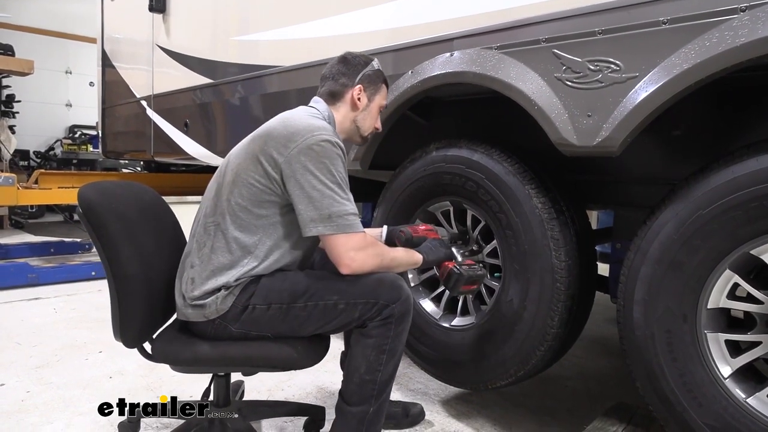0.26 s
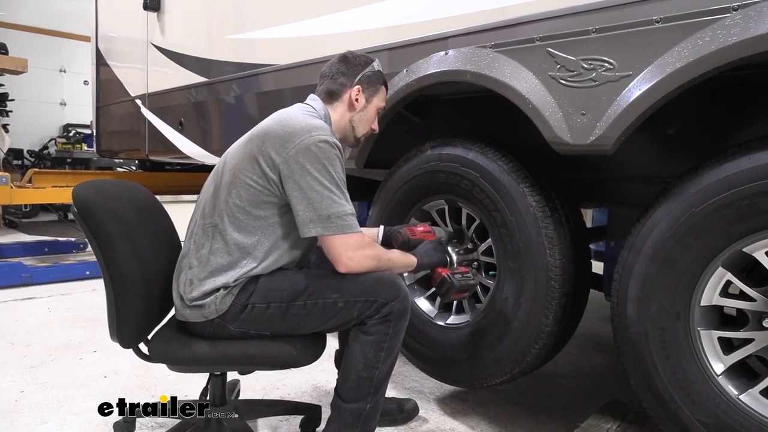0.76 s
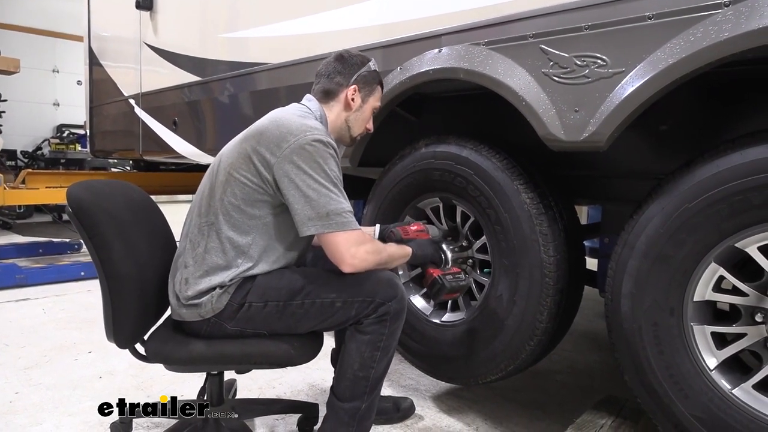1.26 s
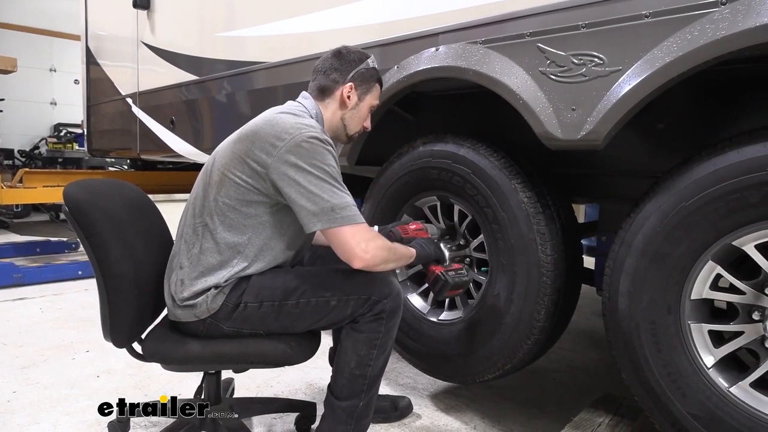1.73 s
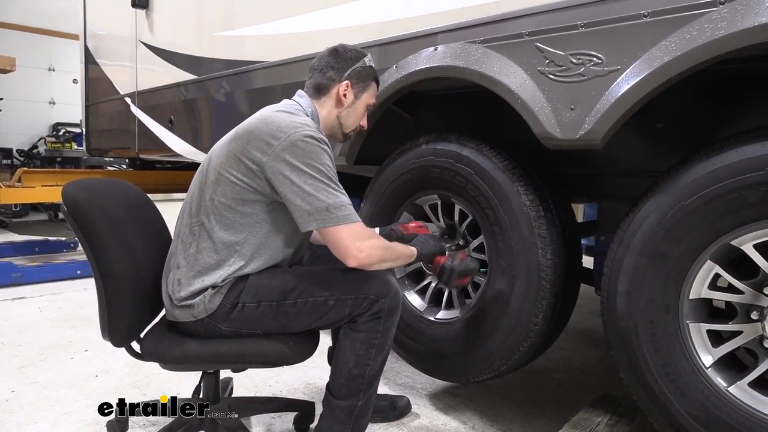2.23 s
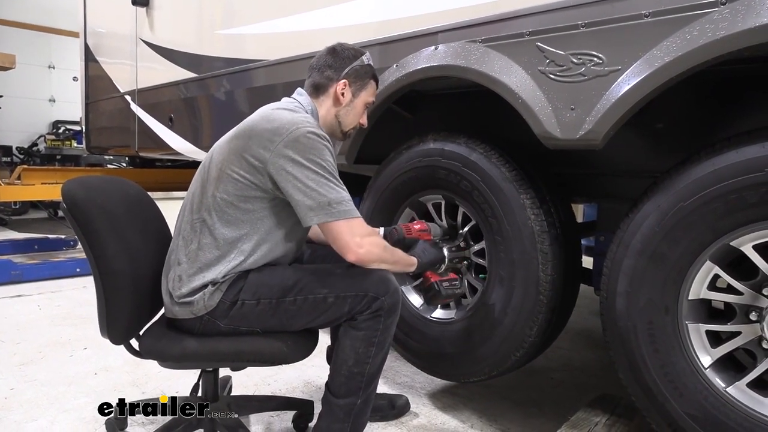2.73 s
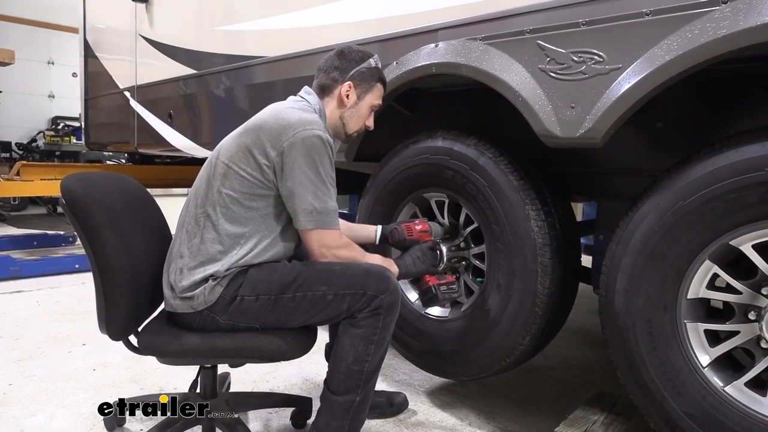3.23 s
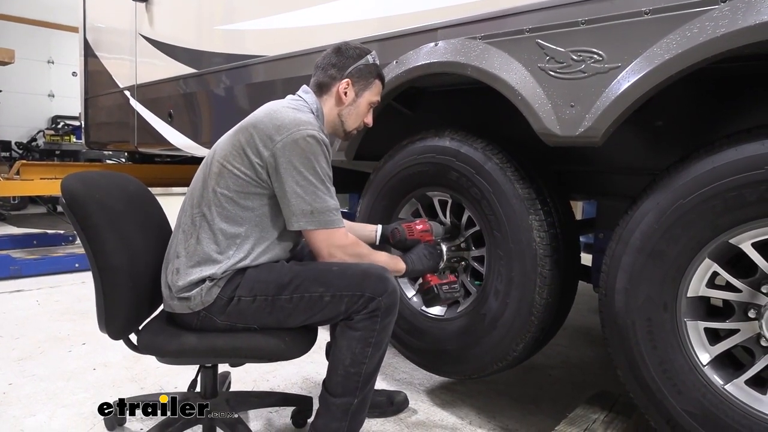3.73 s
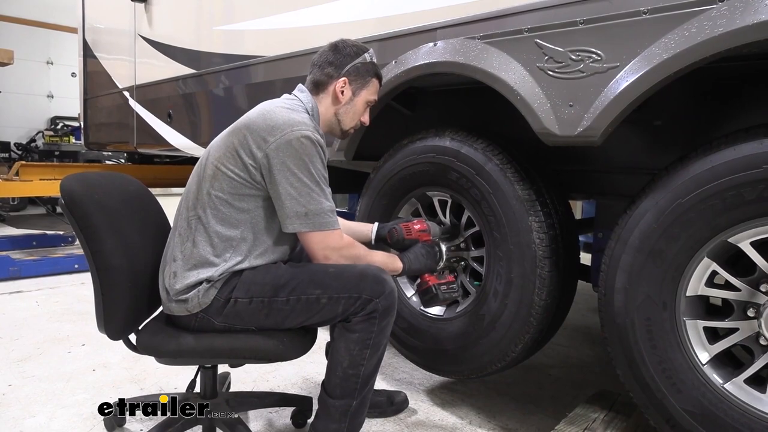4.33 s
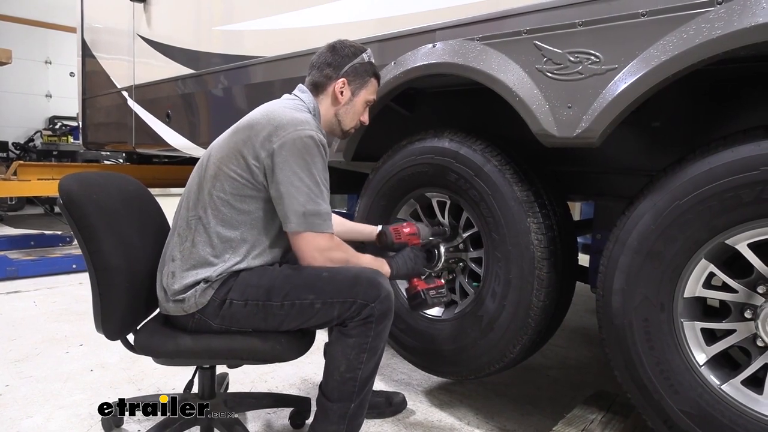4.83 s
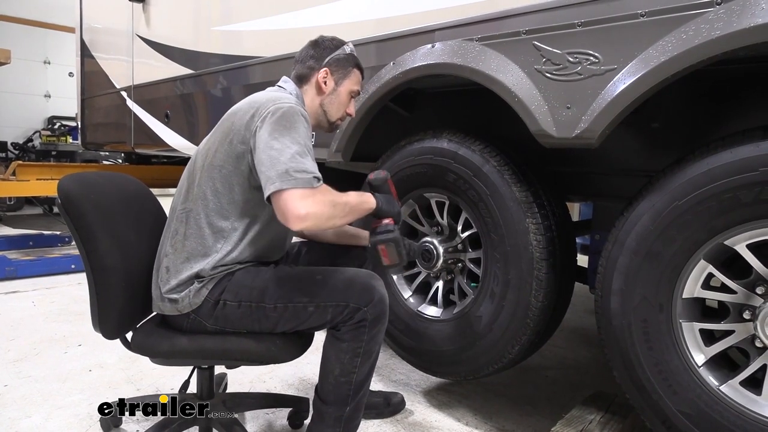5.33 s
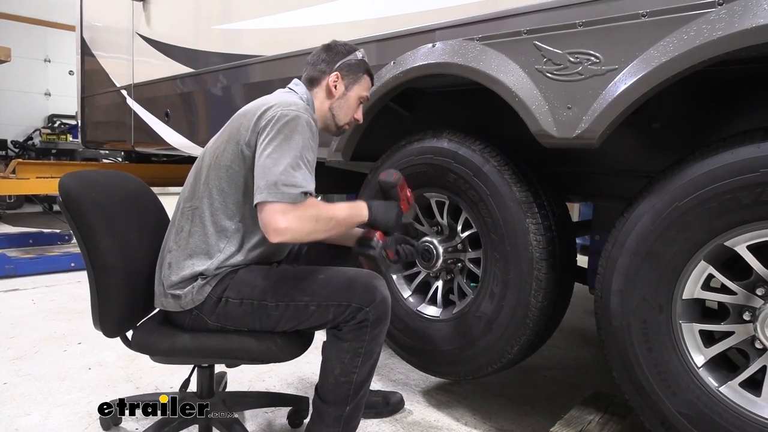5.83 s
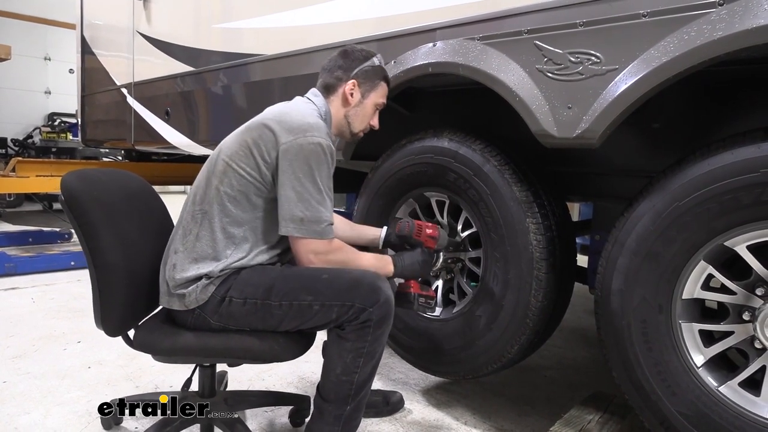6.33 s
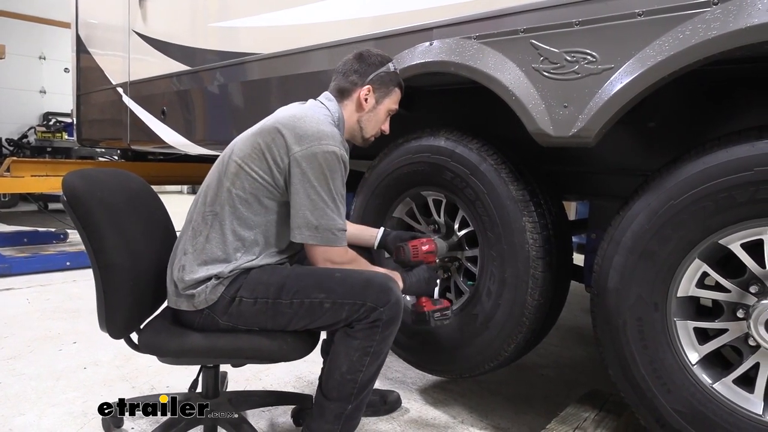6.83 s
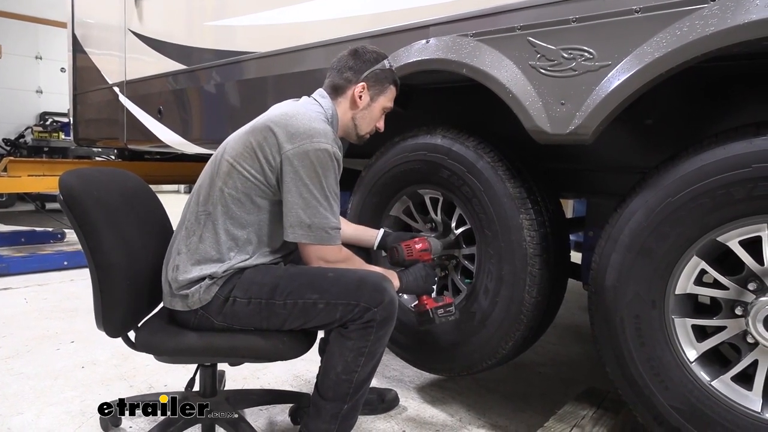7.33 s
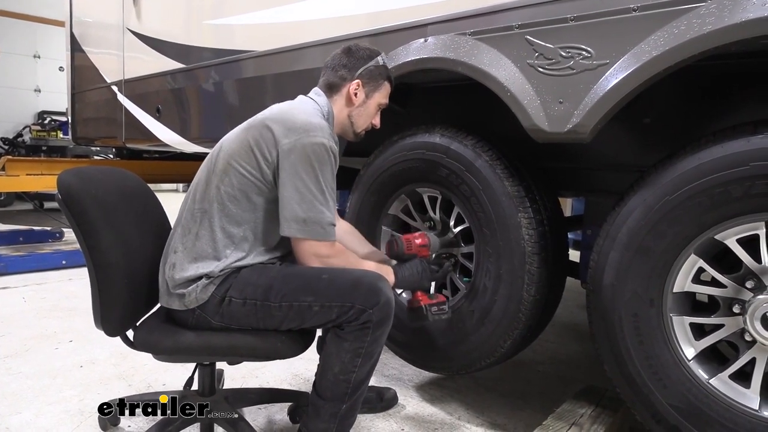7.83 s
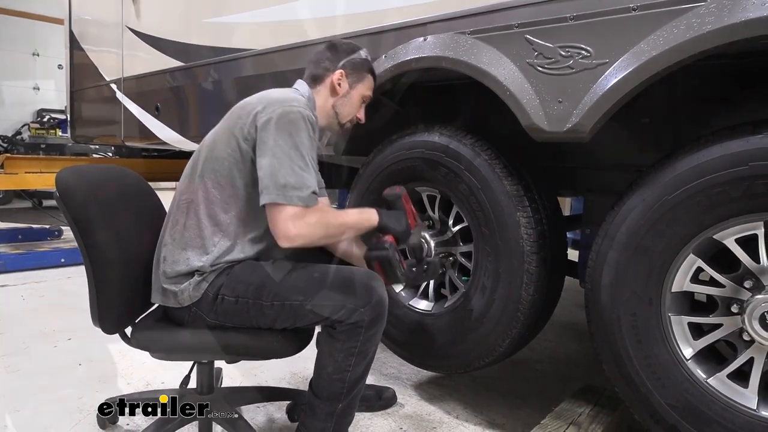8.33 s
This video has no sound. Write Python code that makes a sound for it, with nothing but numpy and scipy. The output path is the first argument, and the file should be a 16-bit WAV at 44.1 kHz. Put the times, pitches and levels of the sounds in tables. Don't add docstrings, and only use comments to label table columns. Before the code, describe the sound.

A cordless impact wrench fires short whining bursts on wheel nuts, motor coasting down and grinding to a stop, with metallic cracks and hollow wheel knocks.

```python
import sys
import numpy as np
from scipy import signal
from scipy.fft import rfft, irfft, next_fast_len
from scipy.io import wavfile
from scipy.ndimage import uniform_filter1d

SR = 44100
rng = np.random.default_rng(int(sys.argv[2]) if len(sys.argv) > 2 else 0)


def ratio_of_db(decibels):
    return 10 ** (np.asarray(decibels, float) / 20)


def persist_wave(psi):
    counts = np.round(np.clip(psi, -1, 1) * 32767).astype(np.int16)
    wavfile.write(sys.argv[1], SR, np.atleast_2d(counts).T)


N = 377937
T = np.arange(N) / SR

# press and release in seconds, pole rate it climbs towards in Hz,
# friction while coasting in Hz per s, time the friction takes to bite in seconds.
PULLS = [
    (1.746, 1.872, 2730, 10750, .09),
    (2.278, 2.352, 2410, 15000, .01),
    (3.695, 3.802, 2940, 3676, .001),
    (4.024, 4.203, 3266, 2384, .001),
    (4.427, 4.529, 3285, 2016, .001),
    (6.932, 7.273, 3377, 2040, .001),
]


def unit(x):
    return x / np.sqrt(np.mean(x ** 2))


def coloured(points, x=None):
    hz, db = np.transpose(points)
    size = next_fast_len(N)
    f = np.maximum(np.arange(size // 2 + 1) * SR / size, 1)
    gain = ratio_of_db(np.interp(np.log(f), np.log(hz), db, left=-90, right=-90))
    source = rng.standard_normal(N) if x is None else x
    return unit(irfft(rfft(source, size) * gain, size)[:N])


def walk(rate):
    k = int(SR / rate)
    held = np.repeat(rng.standard_normal(N // k + 1), k)
    return 1.6 * uniform_filter1d(held, k)[:N]


def ring(x, hz, t60):
    r = np.exp(-np.log(1000) / (t60 * SR))
    w = 2 * np.pi * hz / SR
    return signal.lfilter([0, np.sin(w)], [1, -2 * r * np.cos(w), r * r], x)


def band(x, lo_hz, hi_hz):
    return signal.sosfilt(signal.butter(2, [lo_hz, hi_hz], "bandpass", fs=SR, output="sos"), x)


def add(out, s, x, db):
    i = int(s * SR)
    x = x[:N - i]
    out[i:i + len(x)] += ratio_of_db(db) * x / np.abs(x).max()


def swells(s, db, rise, fall, floor_db):
    power = ratio_of_db(floor_db) ** 2
    for at, top, up, down in np.broadcast(s, db, rise, fall):
        below_top = np.where(T < at, up * (at - T), down * (T - at))
        power = power + ratio_of_db(top - below_top) ** 2
    return 10 * np.log10(power)


def rotor():
    quick_s, slow_s, quick_share = .047, .167, .778
    oil_drag_per_s, air_drag_per_hz_s = .274, 1.3524e-4
    lead_s, settle_s = 0.0058, 0.027
    pressed, released, top, friction, bite = np.transpose(PULLS)
    dt = .001
    steps = np.arange(0, T[-1], dt)
    hz, now, start = np.zeros(len(steps)), 0., 0.
    for i, (s, k) in enumerate(zip(steps, np.searchsorted(pressed, steps) - 1)):
        if k >= 0 and s <= released[k]:
            held = s - pressed[k]
            lag = quick_share * np.exp(-held / quick_s) + (1 - quick_share) * np.exp(-held / slow_s)
            now = top[k] - (top[k] - start) * lag
        else:
            grip = min(abs(s - released[k]) / bite[k], 1)
            slowing = friction[k] + oil_drag_per_s * now + air_drag_per_hz_s * now ** 2
            start = now = max(now - dt * grip * slowing, 0)
        hz[i] = now
    pull = np.maximum(np.searchsorted(pressed - lead_s, T) - 1, 0)
    drive = (T > pressed[0] - lead_s) * np.exp(-np.maximum(T - released[pull], 0) / settle_s)
    return np.interp(T, steps, hz), pull, drive


def pole_lines(hz, turn, on, fan_db, smear_db):
    # multiple of the pole rate, level in dB.
    order_levels = [(2, 2), (3, 1), (4, 0), (6, 2), (10, 4), (14, 2), (20, -5), (30, -12)]
    # resonance in Hz, width in Hz, boost in dB.
    housing = [(700, 300, 9), (1400, 700, 5), (3500, 1200, 3), (5500, 1200, 5), (9000, 1500, 6),
               (12800, 3000, 7)]
    orders, order_db = np.transpose(order_levels)
    lines = np.zeros(N)
    for k in range(2, 31):
        f = k * hz[on]
        boost = sum(db / (1 + (2 * (f - centre) / width) ** 2) for centre, width, db in housing)
        db = np.interp(k, orders, order_db) + boost + 3.3 * walk(40)[on] - 12 - smear_db[on]
        db += np.clip((f - 5500) / 2500, 0, 1) * fan_db[on]
        lines[on] += (f < 16000) * ratio_of_db(db) * np.sin(2 * np.pi * (k * turn[on] + rng.random()))
    return lines


def first_line(hz, turn, smear_db):
    # pole rate in Hz, level in dB.
    line_levels = [(60, -70), (150, -52), (280, -35), (450, -23), (850, -25), (1200, -28), (1600, -34),
                   (2100, -38), (3200, -38)]
    db = np.interp(hz, *np.transpose(line_levels)) + 3.5 + 1.5 * walk(30) - 2 * smear_db
    return ratio_of_db(db) * np.sin(2 * np.pi * turn)


def gearbox_grind(hz, turn, grind_db):
    # pole rate in Hz, level over the gears in dB.
    grind_levels = [(250, -12), (400, 2), (560, 3), (700, -8), (1000, -25)]
    jolts = np.exp(-(turn % 1) / 0.16) * (1 + 0.44 * rng.standard_normal(N))
    grit = unit(band(band(jolts, 2700, 4600), 2700, 4600))
    return ratio_of_db(np.interp(hz, *np.transpose(grind_levels)) + grind_db) * grit


def nut_chatter(drag_db):
    # mode in Hz, level in dB, t60 in seconds.
    chatter_modes = [(1404, -1, 0.014), (3540, -1, 0.0037), (4920, -4, .008)]
    taps_per_s = 210
    taps = (rng.random(N) < taps_per_s / SR) * rng.standard_normal(N)
    rattle = unit(sum(ratio_of_db(db) * unit(ring(taps, f, t60)) for f, db, t60 in chatter_modes))
    return ratio_of_db(-11 + drag_db) * rattle


def motor(hz, pull, drive):
    strain = [
        (-20.5, 4.5, 2.5, -5.5, -30),
        (-11, -0.5, 4, -47, -33),
        (-21.5, 3, -4.4, 4.5, -11),
        (-19, 1, -1.4, -2, 14.3),
        (-18.5, -2.25, -2.9, -2, 1.2),
        (-16.5, -0.5, -2.4, -6.5, 0.5),
    ]
    # pole rate in Hz, level in dB.
    coast_gears = [(40, -53), (200, -39.5), (340, -33.5), (450, -23), (650, -27), (1000, -25.5),
                   (1500, -28), (2300, -24), (3200, -18)]
    # pole rate in Hz, level in dB.
    fan_speed = [(40, -67), (340, -47), (450, -35.5), (700, -36.5), (1000, -32), (1500, -29.5),
                 (1900, -25.5), (2400, -23.5), (3200, -22)]
    # pole rate in Hz, level over the gears in dB.
    coast_lines = [(300, -3), (500, -5), (800, 0), (1300, 4), (2200, 5), (3000, 5)]
    # multiple of the pole rate, level over the gears in dB.
    undertones = [(.4, -12), (.175, -15.5)]
    # frequency in Hz, density in dB per Hz.
    gear_tone = [(88, -50), (150, -10.5), (330, -10), (381, 4), (427, -10.5), (570, -1), (638, -11.5),
                 (1210, -2), (1730, -1.5), (5500, -0.5), (7000, -7.5), (9100, -0.5), (15400, -62)]
    # frequency in Hz, density in dB per Hz.
    fan_tone = [(3820, -20.5), (6500, -11), (7900, -9), (8900, -5), (10400, -6.5), (12000, -4),
                (14300, -3.5), (16000, -18.5)]
    squeeze_s, hiss_db, lines_driven_db = .02, 1.22, 4

    gate = uniform_filter1d(1. * ((hz > 30) | (drive == 1)), size=200)
    on = gate > 0
    hz = uniform_filter1d(hz, size=500)
    turn = np.cumsum(hz) / SR
    driven_db, drag_db, fan_db, start_db, grind_db = np.array(strain)[pull].T
    since_press = np.maximum(T - np.array(PULLS)[pull, 0], 0)
    start_db = start_db * np.exp(-since_press / squeeze_s)
    coast_db = np.interp(hz, *np.transpose(coast_gears)) + drag_db
    gear_db = uniform_filter1d(drive * driven_db + (1 - drive) * coast_db, size=300)
    fan_db = uniform_filter1d(fan_db, size=300) + np.interp(hz, *np.transpose(fan_speed)) - gear_db
    upper_db = drive * lines_driven_db + (1 - drive) * np.interp(hz, *np.transpose(coast_lines))
    upper_db = np.clip(upper_db - .4 * np.clip(drag_db, 0, 12), -6, 8)
    smear_db = np.clip(np.abs(np.gradient(hz)) * 11, 0, 7)

    lines = pole_lines(hz, turn, on, fan_db, smear_db)
    first = first_line(hz, turn, smear_db)
    near_top = np.clip(hz / 2400, 0, 1) ** 3
    under = sum(ratio_of_db(db + 2 * walk(20)) * near_top * np.sin(2 * np.pi * k * turn) for k, db in undertones)
    wobble = 2 * np.pi * undertones[1][0] * turn
    beat = 1 + 0.033 * np.sin(wobble)
    lines *= 1 + .4 * np.sin(wobble + walk(30))
    grain = rng.standard_normal((2, N)) * ratio_of_db(1.2 * rng.exponential(size=(2, N)))
    gears = coloured(gear_tone, grain[0]) * beat * ratio_of_db(hiss_db * walk(45) - 2.5)
    fan = coloured(fan_tone, grain[1]) * beat * ratio_of_db(fan_db + hiss_db * walk(45) + 7.0)
    grind = gearbox_grind(hz, turn, grind_db)
    strained = ratio_of_db(upper_db) * lines + under + gears + fan + grind + nut_chatter(drag_db)
    return gate * (first + ratio_of_db(gear_db + start_db) * strained)


def clicks():
    # time in seconds, peak in dB, top over middle in dB (so too the next four).
    ticks = [(0.6933, -18.5, -35), (1.0876, -14.5, -8), (1.4207, -24.5, -6), (2.173, -33, 2),
             (2.281, -19, -10), (2.5144, -24.5, -9), (2.5361, -24.5, -5), (3.529, -34, -15),
             (3.5693, -26.5, -17), (5.6531, -29, -11), (5.679, -28.5, -21), (5.7357, -27, -9),
             (5.917, -38, -13), (2.878, -42, 1), (3.36, -42, 12), (8.468, -25.5, -7), (8.454, -13.5, 1)]
    blows = [(1.7832, 0.5, 2.5), (1.9157, -13, -1), (2.385, 4, -8), (2.3999, -1, -8), (2.417, -2.5, 0),
             (2.4224, -5, 3.5), (3.686, 1, -15), (3.7156, 4, 0), (3.73, -10, 8), (3.75, -1, -19),
             (3.754, 0.1, -3), (3.8115, -6, -14), (3.8257, -2, -20), (3.8402, -15, -40),
             (6.9262, -0.5, -15), (7.449, -6, -17)]
    clanks = [(0.2394, -22, -3.5), (0.3236, -17.5, -0.5), (0.7801, -22, -4), (0.842, -7, 0),
              (1.7478, -10.5, -27), (3.6518, -25, -4), (5.7184, -29, 5), (6.5914, -14, 12),
              (6.6503, -17, 4), (6.7933, -5.5, -10), (7.6793, -14, -9), (8.3885, -14.5, 8),
              (8.4039, -15.5, -0.5)]
    clunks = [(1.7065, -35.5, 3.5), (2.8044, -42, -19), (2.9008, -35, -5), (3.1166, -37.5, -8),
              (5.5625, -25.5, -39), (5.8855, -40, -3), (8.3524, -47, 9)]
    scrapes = [(2.3016, -12, 0), (3.6022, -30, -14), (5.7594, -29, 6), (6.2102, -28, -27),
               (6.623, -12.5, 10)]
    # events, clank near 1.6 kHz in dB, t60 in seconds.
    kinds = [(ticks, -18, 0.016), (blows, -9.5, 0.014), (clanks, -1.5, 0.038), (clunks, 3.8, 0.06),
             (scrapes, 0.088, 0.07)]
    # frequency in Hz, level in dB, t60 in seconds.
    socket = [(1612, -4, 0.024), (3094, 4.5, 0.14), (3610, 20, 0.029), (9160, 29.5, 0.012)]
    loose_spans = [(5.5, 6.0), (8.3, 8.6)]
    # time in seconds, peak in dB, pitch in Hz.
    chirps = [
        (2.172, -33.5, 4830),
        (2.2393, -32.5, 4800),
    ]
    out = np.zeros(N)
    hits = [(*row, clank_db, t60) for rows, clank_db, t60 in kinds for row in rows]
    chance = rng.standard_normal((len(hits), 5000))
    clank_hz, _, clank_t60 = socket[0]
    for (s, db, top_db, clank_db, t60), noise in zip(hits, chance):
        crack = noise * np.exp(-np.log(1000) * T[:5000] / t60)
        add(out, s, band(crack, 1750, 7650), db)
        add(out, s, band(crack, 7730, 12050), db + top_db)
        clank = band(crack, 590, 2920)
        if any(a < s < b for a, b in loose_spans):
            clank = clank + 0.54 * ring(crack, clank_hz, clank_t60)
        add(out, s, clank, db + clank_db)
        add(out, s, sum(ratio_of_db(d) * ring(crack, f, t) for f, d, t in socket[1:]), db - 17.5)
    for s, db, hz in chirps:
        add(out, s, np.hanning(700) * np.sin(2 * np.pi * hz * T[:700]), db)
    return out


def knocks():
    # time in seconds, peak in dB, pitch in Hz, contact in seconds.
    thump_hits = [(0.241, -14.5, 400, 0.025), (0.328, -6.5, 389, 0.025), (0.39, -22.5, 420, 0.0027),
                  (0.782, -44, 380, 0.014), (0.843, -1, 371, 0.013), (0.889, -19, 342, 0.022),
                  (1.619, -36, 416, 0.027), (1.797, -12, 380, 0.017), (1.938, -4.5, 356, 0.012),
                  (2.179, -23, 406, 0.008), (2.289, -13.5, 380, 0.03), (2.802, -23, 556, 0.021),
                  (2.904, -31, 420, 0.013), (3.228, -32.5, 374, 0.014), (3.695, -16.5, 602, 0.016),
                  (3.856, -12.5, 357, 0.0089), (4.704, -10.5, 416, 0.02), (4.723, -10, 389.3, 0.051),
                  (4.77, -16.5, 366, 0.026), (4.8, -18, 382, 0.015), (4.841, -12.5, 403, 0.0087),
                  (6.595, -10.5, 360, 0.0051), (6.637, -16.5, 377, 0.046), (6.789, -3, 366, 0.017),
                  (6.938, -17, 393, 0.054)]
    # frequency in Hz, level in dB, t60 in seconds.
    thump_modes = [(300, -6.5, 0.094), (439.4, -3.5, 0.047), (503, -3, 0.021), (667, -7, 0.045)]
    thump_t60_s = 0.052
    out = np.zeros(N)
    chance = rng.standard_normal((len(thump_hits), 3000))
    for (s, db, hz, contact), rough in zip(thump_hits, chance):
        hold = np.exp(-(T[:3000] / np.clip(contact, .002, .04)) ** 3)
        push = np.zeros(9000)
        push[:3000] = hold * (np.cos(2 * np.pi * hz * T[:3000]) + 5 * rough)
        x = ring(push, hz, thump_t60_s) + sum(ratio_of_db(d) * ring(push, f, t) for f, d, t in thump_modes)
        add(out, s, band(x, 140, 4400), db)
    return out


def surroundings(running):
    # time in seconds, rumble in dB, wheel hum in dB.
    bumps = [
        (0.88, -33, -28.5),
        (1.962, -29.5, -25),
        (2.36, -24.5, -43),
        (3.822, -35, -29.5),
        (3.4, -52, -44.5),
        (4.63, -61, -35.5),
        (5.7, -53, -71),
        (6.83, -30, -33.5),
        (7.5, -42, -29),
    ]
    # loudest moment in seconds, level in dB, top over middle in dB,
    # rise and fall in dB per s.
    rustle = [(0.41, -40.5, 3.5, 10, 40), (0.86, -35.5, -7.5, 500, 38.5), (1.5, -48, 3, 80, 116),
              (2.1, -43.5, -2.5, 200, 25), (2.44, -49.5, 0.5, 198, 65), (2.93, -61, 5, 200, 66),
              (3.2, -50, 1, 52, 31), (5.55, -44, -11, 231, 57), (5.77, -59, 8.5, 512, 95),
              (6.11, -48, -8, 143, 104), (6.22, -45.5, -3.5, 889, 22), (6.619, -35.5, -1, 900, 82),
              (6.8, -50, 0, 300, 7), (8.3, -45.5, -15, 200, 22), (8.45, -60.5, 9.5, 200, 19)]
    # frequency in Hz, density in dB per Hz.
    rumble_tone = [(12, -40), (20, -0.5), (62, 1.5), (108, 1), (155, -7.5), (195, -4.5), (260, -17),
                   (340, -15), (570, -120)]
    # frequency in Hz, density in dB per Hz.
    cloth_tone = [(350, 4), (600, 5), (1030, 0.5), (1570, -1), (1980, -2), (2910, -5.5), (5950, -8),
                  (10300, -9.5), (13600, 1.5), (16000, 3)]
    floor_rumble_db, floor_hum_db, floor_cloth_db, cloth_top_db = -45.5, -53, -54, -6.5
    duck_db, recover_s = -9, 0.74

    since = T - np.maximum.accumulate(np.where(running, T, -np.inf))
    ducked_db = uniform_filter1d(duck_db * np.exp(-since / recover_s), size=2000)
    s, rumble_db, hum_db = np.transpose(bumps)
    rumble_db = swells(s, rumble_db, 124, 152, floor_rumble_db + ducked_db)
    hum_db = swells(s, hum_db, 79.5, 66.5, floor_hum_db + ducked_db)
    s, db, top_db, rise, fall = np.transpose(rustle)
    cloth_db = swells(s, db, rise, fall, floor_cloth_db + ducked_db)
    top_db = swells(s, db + top_db, rise, fall, floor_cloth_db + cloth_top_db + ducked_db) - cloth_db

    rumble = ratio_of_db(rumble_db + 0.43 * walk(29)) * coloured(rumble_tone)
    noise = rng.standard_normal(N)
    cavity = unit(unit(ring(noise, 376.4, 0.053)) + 0.69 * unit(band(noise, 154, 450)))
    hum = ratio_of_db(hum_db + 2 * walk(14)) * cavity
    grain = rng.standard_normal(N) * ratio_of_db(1.3 * rng.exponential(size=N))
    cloth = coloured(cloth_tone, grain)
    middle = unit(band(cloth, 470, 4900))
    top = unit(band(cloth[::-1], 4250, 11700))
    return rumble + hum + ratio_of_db(cloth_db + 0.5 * walk(33)) * (middle + ratio_of_db(top_db + 0.27 * walk(9)) * top)


def far_whines():
    # start and end in seconds, centre in Hz, width in Hz, level in dB.
    machines = [
        (0, 0.553, 1980, 120, -57),
        (0.88, 1.36, 4300, 300, -58),
        (5.78, 6.007, 934, 40, -63),
    ]
    out = np.zeros(N)
    for start, end, hz, width, db in machines:
        fade = uniform_filter1d(1. * (T >= start) * (T < end), size=4000)
        out += ratio_of_db(db) * fade * unit(band(rng.standard_normal(N), hz - width / 2, hz + width / 2))
    return out


def shed_tail(near):
    t60_s, level_db = 0.34, -14
    tail = rng.standard_normal(SR) * np.exp(-np.log(1000) * T[:SR] / t60_s)
    tail /= np.sqrt(np.sum(tail ** 2))
    return ratio_of_db(level_db) * signal.fftconvolve(band(near, 156, 4000), tail)[:N]


def width_trace(mid):
    t60_s, level_db = 0.031, -27
    scatter = unit(rng.standard_normal(4000) * np.exp(-np.log(1000) * T[:4000] / t60_s)) / np.sqrt(4000)
    bright = band(mid, 1400, 15000) + 0.28 * band(mid, 1700, 4500)
    return ratio_of_db(level_db + 0.74 * walk(20)) * signal.fftconvolve(bright, scatter)[:N]


def scene():
    hz, pull, drive = rotor()
    near = motor(hz, pull, drive) + knocks() + clicks()
    mid = near + shed_tail(near) + surroundings(hz > 0) + far_whines()
    side = width_trace(mid)
    return np.array([mid + side, mid - side])


def top_cut(x):
    return signal.sosfilt(signal.butter(12, 16830, fs=SR, output="sos"), x)


def record(dry):
    rounded = .9 * np.tanh(dry / .9)
    cut = signal.sosfilt(signal.ellip(8, .2, 60, 15900, fs=SR, output="sos"), rounded)
    return top_cut(cut)


dry = scene()
out = record(dry)
persist_wave(out)
```